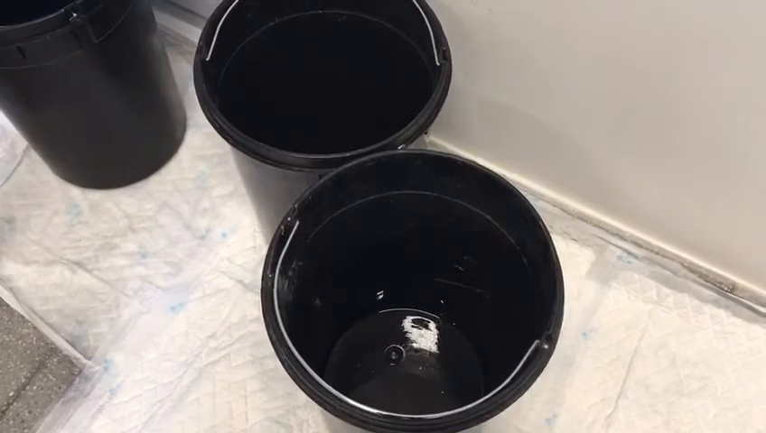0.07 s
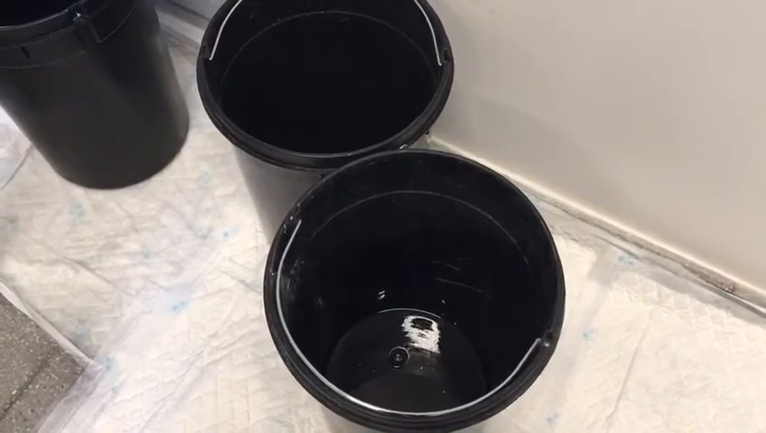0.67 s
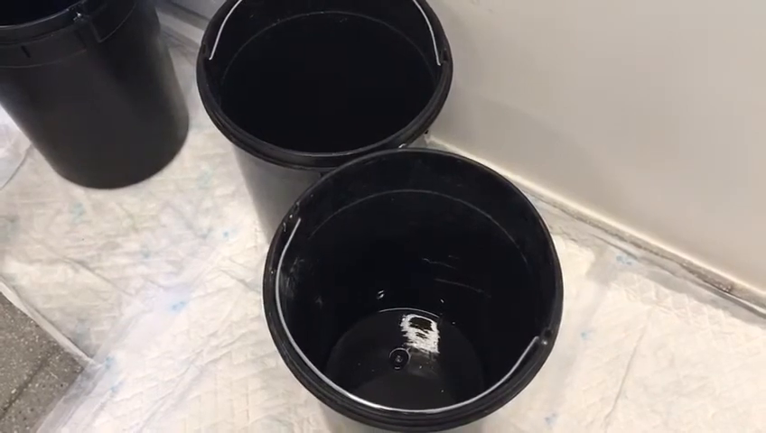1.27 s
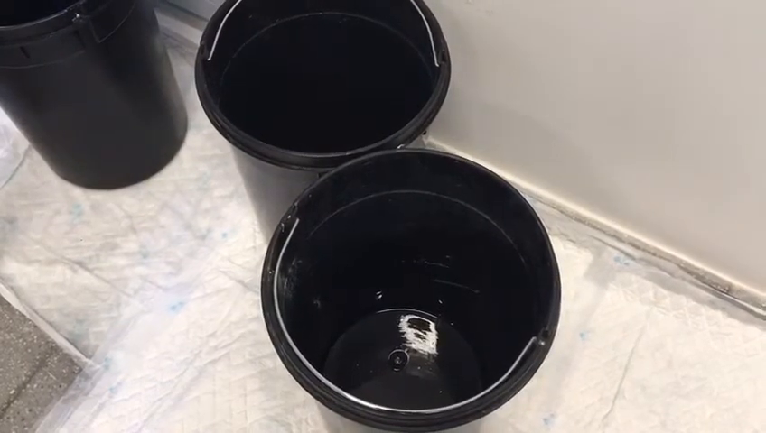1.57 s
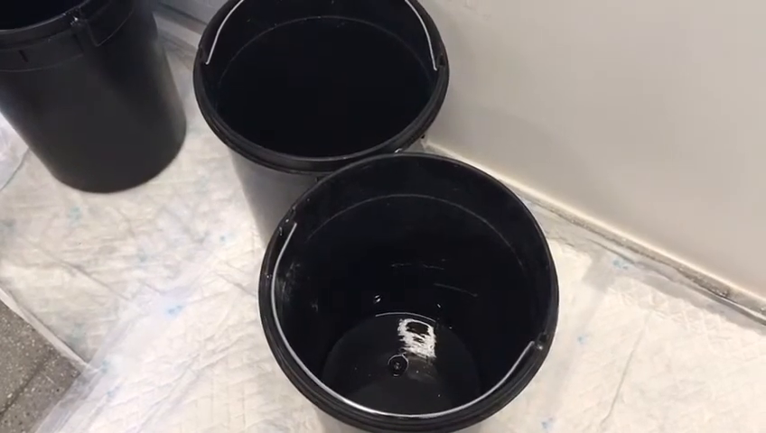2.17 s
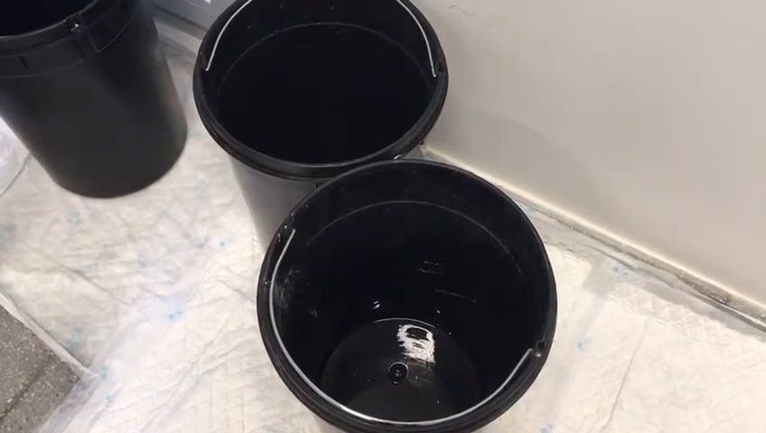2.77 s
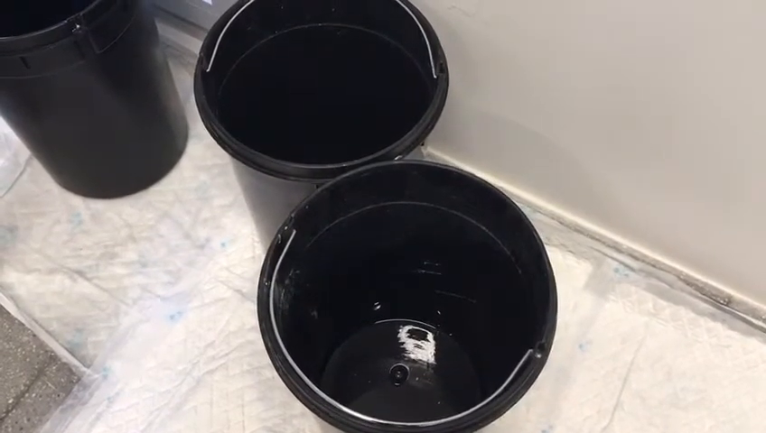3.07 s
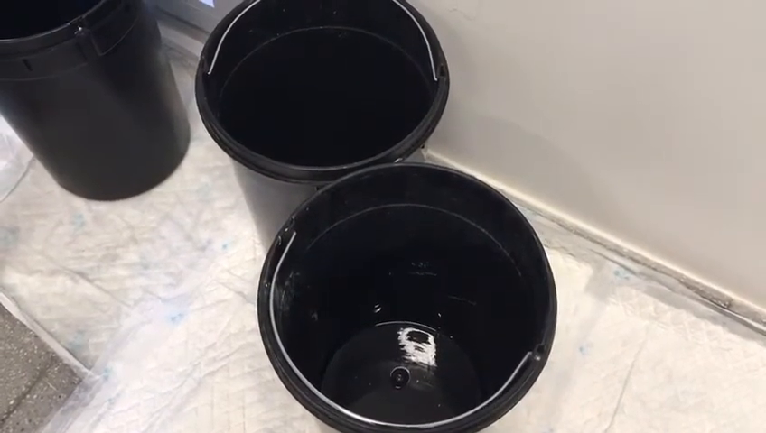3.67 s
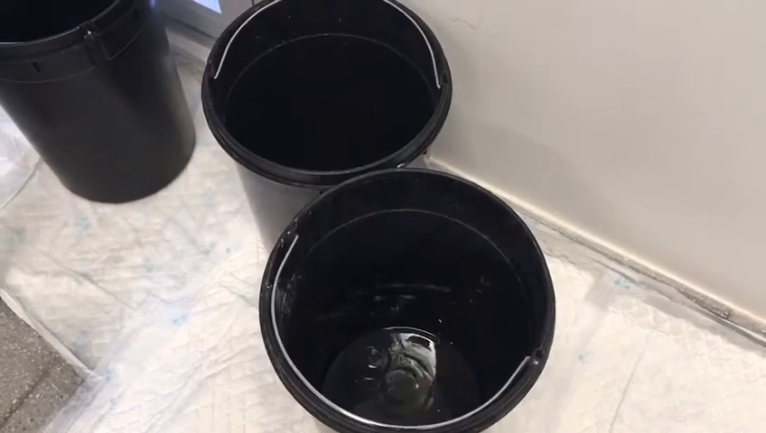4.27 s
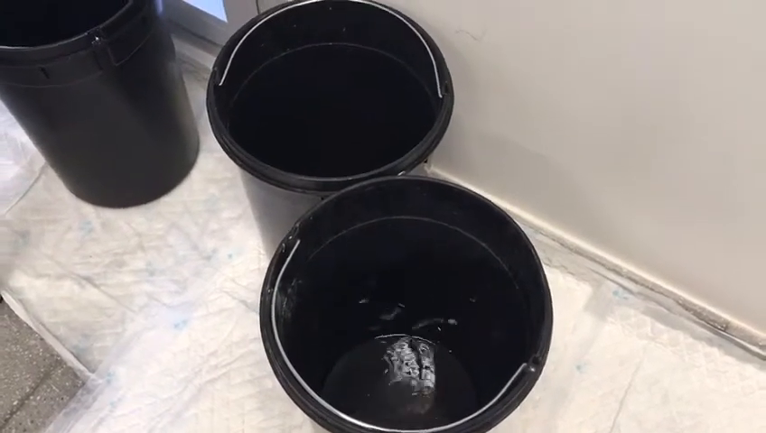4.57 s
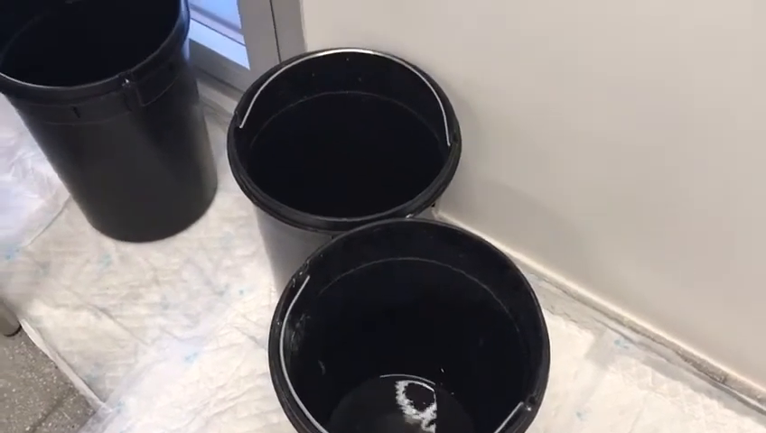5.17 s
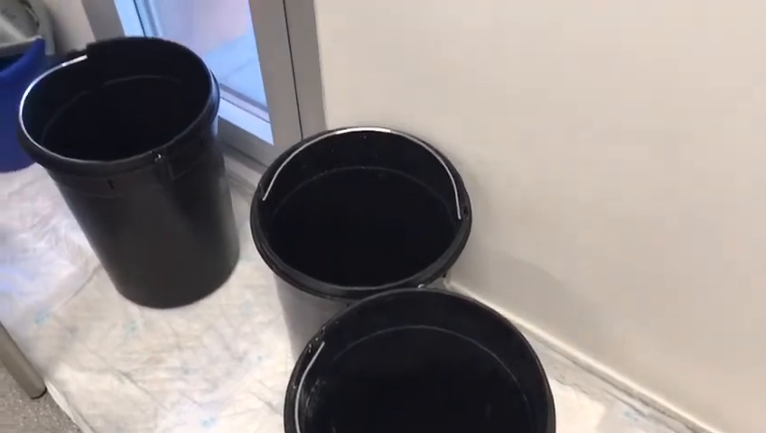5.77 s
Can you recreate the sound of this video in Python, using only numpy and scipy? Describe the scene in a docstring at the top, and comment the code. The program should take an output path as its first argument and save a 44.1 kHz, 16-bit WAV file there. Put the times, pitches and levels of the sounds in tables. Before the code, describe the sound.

Ventilation hums and rushes softly in a quiet room, with a short soft swish and low bump early on. Later, a single water drop slaps sharply into a plastic bucket holding a film of water, close to the microphone. The bucket rings briefly, and thrown-up droplets fall back with two small, bright ticks. A short room echo fades and the hum carries on.

```python
"""A drop from a leak slaps into a plastic bucket holding a film of water, near the microphone.
The bucket rings, and thrown-up droplets fall back, ticking and trapping tiny bubbles; the quiet
room answers with a short tail. Ventilation hums and rushes behind it all. Before the drop come
a short soft swish, two tiny ticks and a faint high whine that comes and goes."""
import sys
import numpy as np
from scipy import signal
from scipy.fft import rfft, irfft
from scipy.io import wavfile

SR = 44100
rng = np.random.default_rng(int(sys.argv[2]) if len(sys.argv) > 2 else 0)


def persist_wave(psi):
    """Save psi, clipped to +-1, as 16-bit WAV."""
    counts = np.round(np.clip(psi, -1, 1) * 32767).astype(np.int16)
    wavfile.write(sys.argv[1], SR, np.atleast_2d(counts).T)


N = 256662
TIME = np.arange(N) / SR
DROP_S, DROP_DB = 4.2115, -34


def undb(db):
    """Decibels to gain."""
    return 10 ** (np.asarray(db) / 20)


def curve(rows):
    """Gain over time through (time_s, level_db) points."""
    return undb(np.interp(TIME, *np.transpose(rows)))


def bell(centre_s, half_length_s):
    """A smooth swell, 1 at its centre."""
    return np.exp(-((TIME - centre_s) / half_length_s) ** 2)


def since(start_s):
    """Seconds since a moment, zero before it."""
    return np.maximum(TIME - start_s, 0)


def fade(start_s, t60_s):
    """Exponential decay from a moment on, 60 dB down after t60_s."""
    return (TIME >= start_s) * np.exp(-np.minimum(np.log(1000) * since(start_s) / t60_s, 50))


def ring(start_s, hz, t60_s, rise=0):
    """A damped sine whose pitch climbs by the share rise as it dies."""
    t = since(start_s)
    glide = 1 + rise * np.minimum(t / t60_s, 1) / 2
    return fade(start_s, t60_s) * np.sin(2 * np.pi * hz * t * glide)


def shaped(gain):
    """Unit-rms noise with the given gain at each frequency."""
    hz = np.maximum(np.fft.rfftfreq(N, 1 / SR), 1)
    x = irfft(rfft(rng.standard_normal(N)) * gain(hz), N)
    return x / np.std(x)


def noise(colour):
    """Unit-rms noise coloured by (frequency_hz, gain_db) points."""
    hz, db = np.transpose(colour)
    return shaped(lambda f: undb(np.interp(np.log(f), np.log(hz), db)))


def drone(hz, width_hz, steadiness=0):
    """A narrow resonance stirred by turbulence; steadiness 0-1 evens out its swells."""
    band = signal.hilbert(shaped(lambda f: 1 / (1 + (2 * (f - hz) / width_hz) ** 2)))
    x = band.real / np.abs(band) ** steadiness
    return x / np.std(x)


# The ventilation's low drone: time_s, level_db
LOW_DRONE_LEVELS = [(0, -55), (.85, -56.5), (.93, -46.5), (1.06, -46), (1.2, -55.5), (1.8, -48.5),
                    (2.0, -51.5), (2.07, -44.5), (2.2, -51), (2.42, -44), (2.85, -45.5), (3.05, -52),
                    (3.35, -47), (4.4, -54.5), (4.56, -46.5), (5.05, -53), (5.82, -48)]
# Swells of its upper drone: centre_s, half_length_s, rise_db
UPPER_DRONE_SWELLS = [(.75, 0.079, 6.5), (2.15, 0.23, 2.3), (3.27, 0.18, 8.7), (5.13, 0.13, 7.2)]

def hum():
    """The ventilation fills the room with two low, wavering drones."""
    low = curve(LOW_DRONE_LEVELS) * drone(hz=59.8, width_hz=11.8, steadiness=0.6)
    upper_db = -58.5 + sum(db * bell(s, half) for s, half, db in UPPER_DRONE_SWELLS)
    return low + undb(upper_db) * drone(hz=104.5, width_hz=11.8, steadiness=0.58)


# Duct resonances in the rush of air: pitch_hz, width_hz, relative_db
DUCT_RESONANCES = [(616.5, 36, -16.5), (667, 60, -13), (869, 31, -13), (973, 103, -9), (1320, 12, -17),
                   (1430, 180, -15), (1914, 21, -30), (2014, 13, -26)]
# Colours of the rushing air and of the fine hiss: frequency_hz, gain_db
AIR_COLOUR = [(15, -10), (27, 12.5), (135, 12), (165, 9), (210, 9.5), (270, -1.5), (500, -5.5), (680, -3.5),
              (1000, -4), (1430, -6.5), (1800, -11.5), (2600, -16), (4000, -28.5), (12000, -63)]
HISS_COLOUR = [(1500, -2), (2800, 4), (4200, 1), (5000, -2), (6000, 3), (7700, -1.5), (9200, 2),
               (10400, -1.5), (11200, 1.5), (12500, -10.5)]

def airflow(move_s=3.96, air_db_per_s=0.5, hiss_db_per_s=1.6):
    """Air rushes through a resonant duct; air and hiss grow as the microphone moves off at move_s."""
    moving_s = since(move_s)
    duct = sum(undb(db) * drone(hz, width) for hz, width, db in DUCT_RESONANCES)
    air = undb(7 + air_db_per_s * moving_s) * noise(AIR_COLOUR)
    hiss = undb(-73.5 + hiss_db_per_s * moving_s) * noise(HISS_COLOUR)
    rush_db = -60.5 + 0.6 * bell(centre_s=2.8, half_length_s=2.5)
    return undb(rush_db) * (air + duct) + hiss


# The middle band of the rushing air: time_s, level_db
MIDRANGE_LEVELS = [(.55, -73), (.8, -63.5), (1.8, -67.5), (3.1, -64.5), (3.6, -66), (3.85, -78)]
# Its colour: frequency_hz, gain_db
MIDRANGE_BAND = [(500, -41), (850, -3.5), (1000, 1), (1150, -5.5), (1430, 0.5), (1700, -9), (2300, -39)]

def air_swell():
    """The midrange of the rushing air comes forward for a few seconds."""
    return curve(MIDRANGE_LEVELS) * noise(MIDRANGE_BAND)


# Swells of the whine in the background: centre_s, half_length_s, level_db
WHINE_SWELLS = [(.01, 0.026, -78), (2.8, .045, -83), (3.06, .1, -82), (3.195, .04, -81.5)]

def whine():
    """A thin, high tone comes and goes in the ventilation."""
    swells = sum(undb(db) * bell(s, half) for s, half, db in WHINE_SWELLS)
    return swells * drone(hz=7120, width_hz=24, steadiness=0.86)


# Faint ticks in the room: start_s, level_db
DRY_TICKS = [(.106, -69), (3.182, -68)]
# Their colour: frequency_hz, gain_db
DRY_TICK_COLOUR = [(2000, -10), (6000, -5), (8000, 8), (12000, -9)]

def ticks():
    """Tiny dry bursts of noise, barely above the hiss."""
    return noise(DRY_TICK_COLOUR) * sum(undb(db) * fade(s, t60_s=0.028) for s, db in DRY_TICKS)


# Colour of the swish: frequency_hz, gain_db
BRUSH_COLOUR = [(90, 5), (330, 16), (700, -1), (2500, 1), (4400, -0.5), (5100, -3), (6900, -4.5),
                (7900, 3.5), (8600, 5.5), (9400, 0.5), (11000, 0.5), (12000, -5)]
# The low bump under it: start_s, pitch_hz, level_db, t60_s
SWISH_BUMP = [(1.89, 189, -42, 0.19)]

def swish(start_s=1.886, level_db=-58.5, attack_s=0.014, t60_s=0.45):
    """A soft brush of noise rises quickly and dies away over a low bump."""
    attack = np.minimum(since(start_s) / attack_s, 1)
    release = np.exp(-np.log(1000) * since(start_s + attack_s) / t60_s)
    bump = sum(undb(db) * ring(s, hz, t60) for s, hz, db, t60 in SWISH_BUMP)
    return undb(level_db) * attack * release * noise(BRUSH_COLOUR) + bump


def room(sound, wet_db=-9, t60_s=0.61, treble_t60_s=0.32, split_hz=3100):
    """The walls return a diffuse tail to the microphone; the treble dies sooner."""
    white = rng.standard_normal(N)
    low = signal.sosfilt(signal.butter(2, split_hz, fs=SR, output="sos"), white)
    high = signal.sosfilt(signal.butter(2, split_hz, "high", fs=SR, output="sos"), white)
    tail = (low * fade(0.0033, t60_s) - undb(-2) * high * fade(0.0034, treble_t60_s))[:SR]
    tail /= np.sqrt(np.sum(tail ** 2))
    return undb(wet_db) * signal.fftconvolve(sound, tail)[:N]


def bubble_ping(level_db=-72.5, pitch_hz=4510, width_hz=320):
    """One bright bubble lingers in the bucket as a narrow, fluttering ring."""
    flutter = shaped(lambda f: 1 / (1 + (2 * (f - pitch_hz) / width_hz) ** 4))
    return undb(level_db) * fade(start_s=4.36, t60_s=0.33) * flutter


# Droplets falling back into the bucket: start_s, pitch_hz, level_db, t60_s
FALLING_DROPLETS = [(4.3574, 10800, -44, 0.004), (4.3575, 2130, -44, .013), (4.3585, 4400, -47, .009),
                    (4.3598, 8600, -55, .006), (4.3600, 4700, -54, .016), (4.4672, 10400, -60, 0.005),
                    (4.4691, 10800, -52, 0.007), (4.4699, 6600, -54, 0.014), (4.4712, 9600, -53, .005),
                    (4.4721, 6950, -47, 0.005), (4.4728, 11200, -52.5, 0.0043)]

def droplets():
    """Each droplet ticks on the water and traps a tiny bubble that rings upward."""
    tick = undb(-10.5) * noise(HISS_COLOUR)
    return sum(undb(db) * (ring(s, hz, t60, rise=0.04) + tick * fade(s, t60_s=0.0063))
               for s, hz, db, t60 in FALLING_DROPLETS)


def spray(count=4, spread_s=0.004, crack_db=-35.5, speck_db=-57, ring_cycles=34):
    """The drop cracks as it bursts, and specks of spray tick at random just after."""
    crack = ring(DROP_S, hz=5470, t60_s=0.0014)
    starts_s = DROP_S + spread_s * rng.random(count)
    pitches_hz = np.linspace(5750, 11000, count)
    specks = sum(ring(s, hz, ring_cycles / hz) for s, hz in zip(starts_s, pitches_hz))
    return undb(crack_db) * crack + undb(speck_db) * specks


# Modes of the plastic bucket and its air column: pitch_hz, relative_db, t60_s
BUCKET_MODES = [(159, -14.5, 0.3), (187, -14.5, 0.37), (266, -5, 0.048), (374, -12.5, 0.26),
                (423, -12, 0.044), (589, 1, 0.06), (700, -10.5, 0.043), (833, -12, 0.054),
                (1031, -12, 0.055), (1269, -11, 0.035), (1435, -16.5, .039), (1683, -13.5, 0.036),
                (1937, -15, 0.035), (2380, -25, 0.06), (2507, -19, 0.028), (3000, -22.5, 0.026)]

def bucket(build_cycles=1.2):
    """The struck bucket rings: neighbouring modes swing opposite ways, low ones build up slowest."""
    body = np.zeros(N)
    for k, (hz, db, t60) in enumerate(BUCKET_MODES):
        build_up = 1 - np.exp(-since(DROP_S) * hz / build_cycles)
        body += (-1) ** k * undb(db) * build_up * ring(DROP_S, hz, t60)
    return body


# Colour of the splash on the film of water: frequency_hz, gain_db
SPLASH_COLOUR = [(300, -18), (700, -11), (1300, -3), (1900, -7), (2600, -6), (4200, -14.5), (5800, -20),
                 (8000, -17), (12000, -19)]

def drop(slap_hz=1270, trip_s=0.00247, trip_gain_db=-3.3, dulling=0.78):
    """The drop slaps the bottom with one sharp pressure swing, rings the bucket and splashes."""
    slap = np.zeros(N)
    for trip in range(4):  # up and down the bucket, weaker and duller each time
        swing = ring(DROP_S + trip * trip_s, slap_hz * dulling ** trip, t60_s=0.0052)
        slap += undb(4.6 + trip * trip_gain_db) * swing
    splash = undb(-10) * noise(SPLASH_COLOUR) * fade(DROP_S, t60_s=0.03)
    return undb(DROP_DB) * (slap + bucket() + splash)


def scene():
    """From beside the bucket: the drip and its room tail, over the swish, ticks and ventilation."""
    water = drop() + spray() + droplets() + bubble_ping()
    echo = room(water)
    small_sounds = swish() + ticks()
    ventilation = hum() + airflow() + whine() + air_swell()
    return (water + echo + small_sounds + ventilation)[None]


def record(dry):
    """A phone's mono microphone, with a steep cut of the top treble."""
    top_hz = 11950
    return signal.sosfilt(signal.ellip(10, 0.2, 60, top_hz, fs=SR, output="sos"), dry)


dry = scene()
out = record(dry)
persist_wave(out)
```